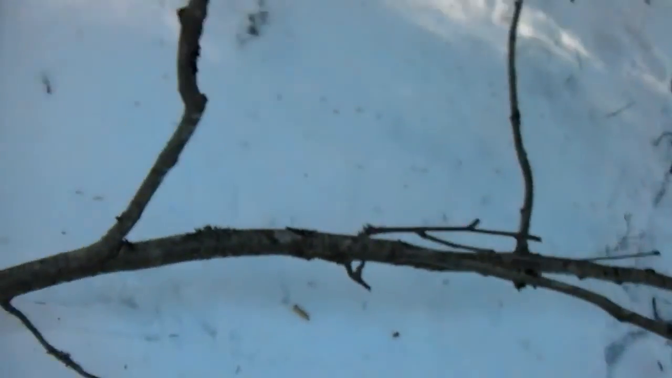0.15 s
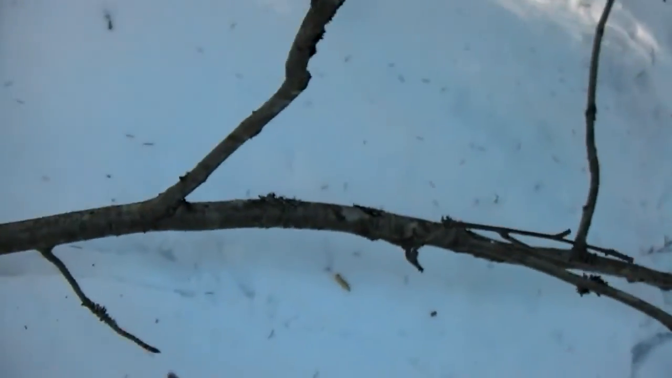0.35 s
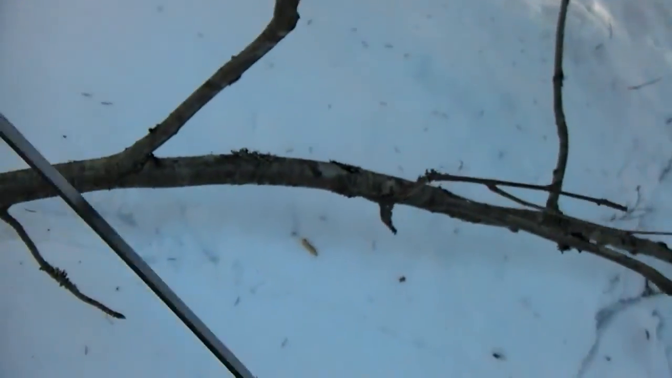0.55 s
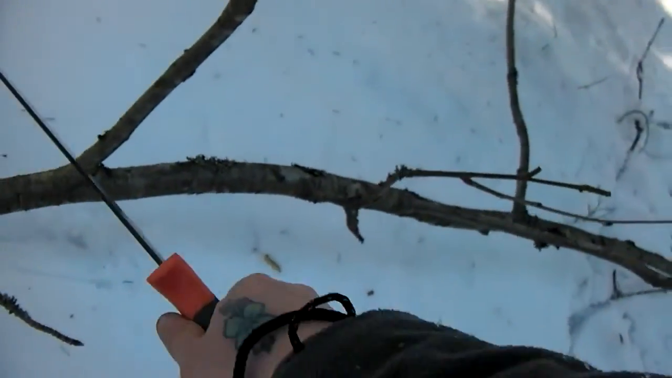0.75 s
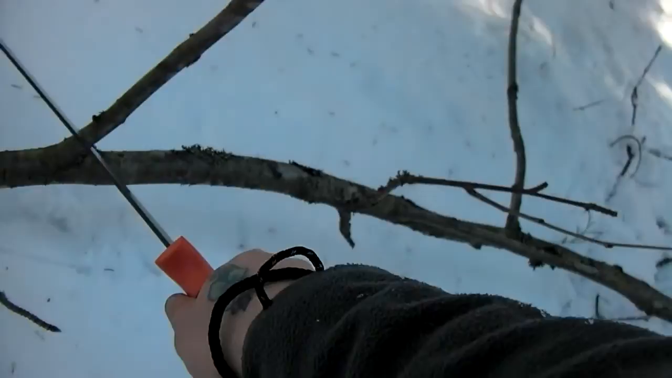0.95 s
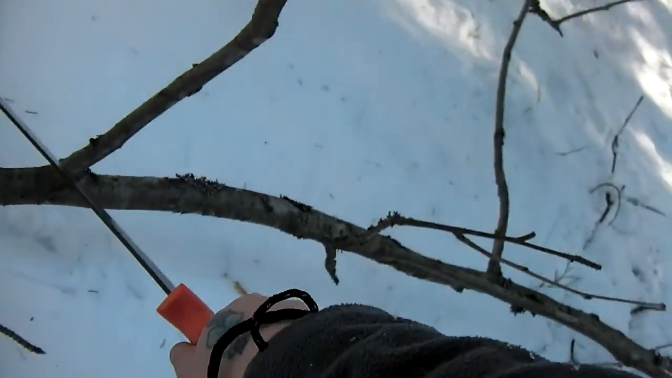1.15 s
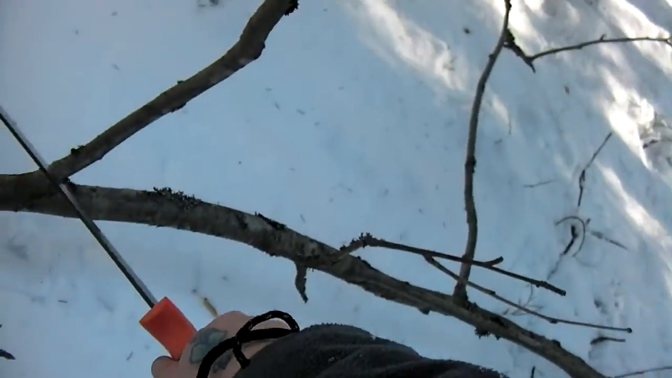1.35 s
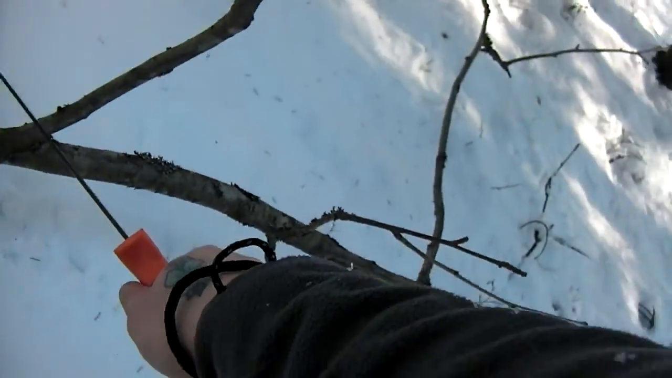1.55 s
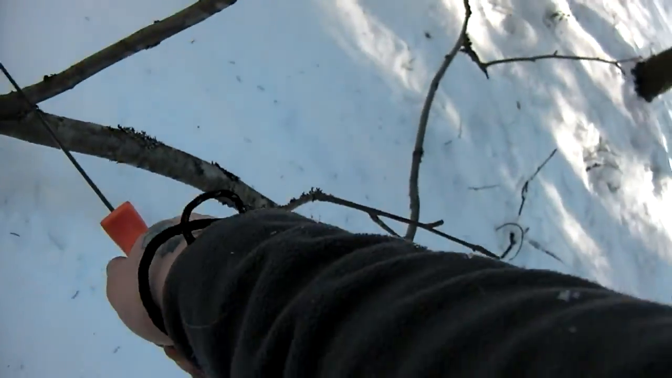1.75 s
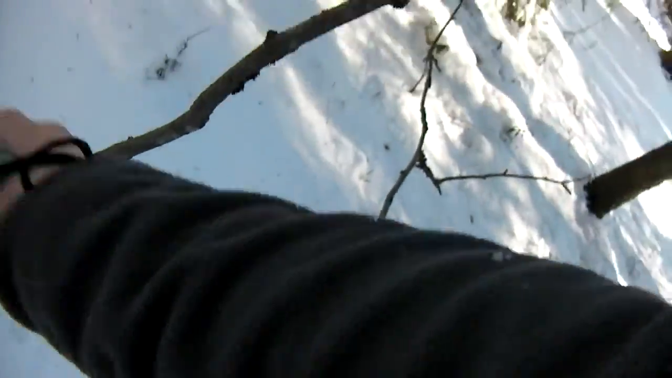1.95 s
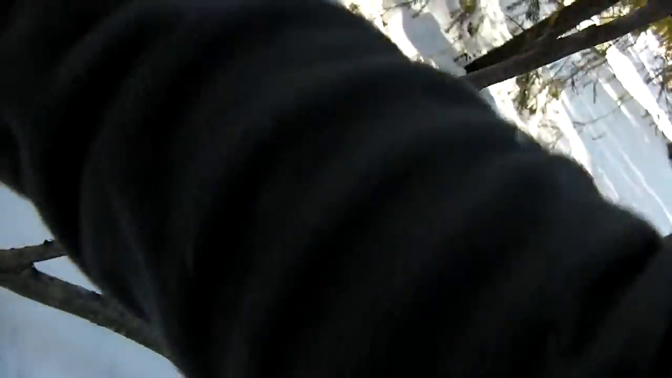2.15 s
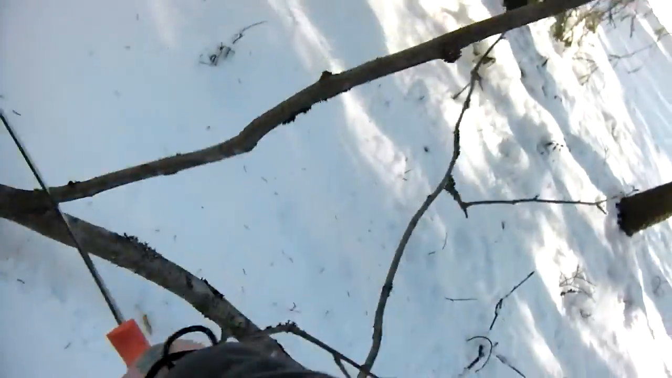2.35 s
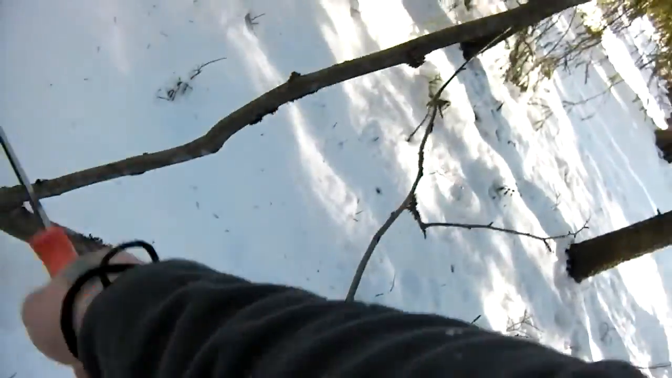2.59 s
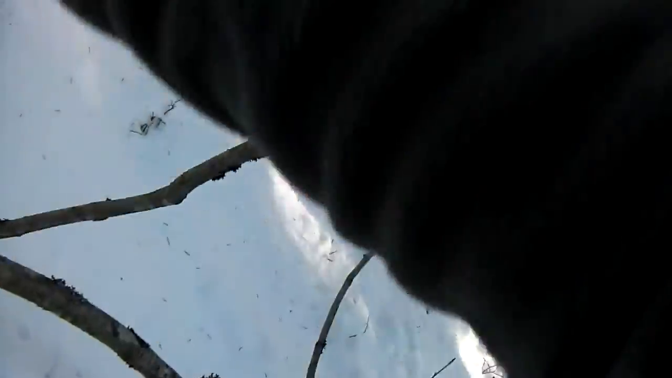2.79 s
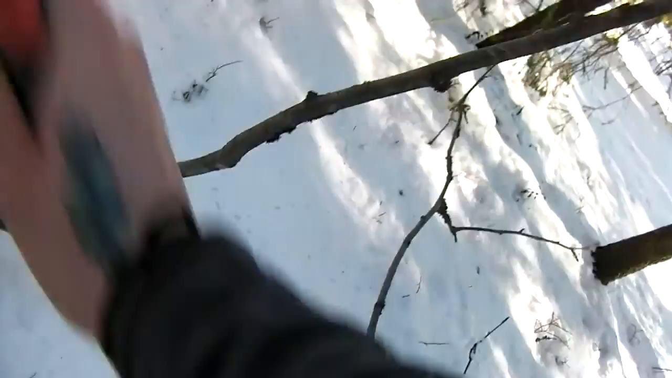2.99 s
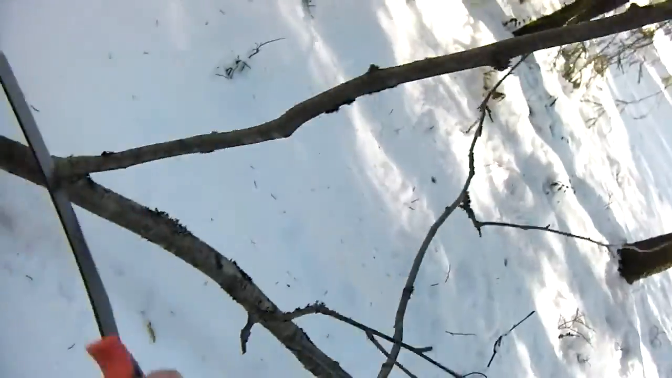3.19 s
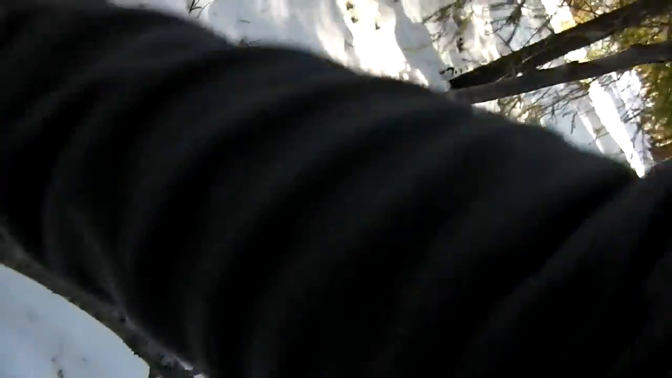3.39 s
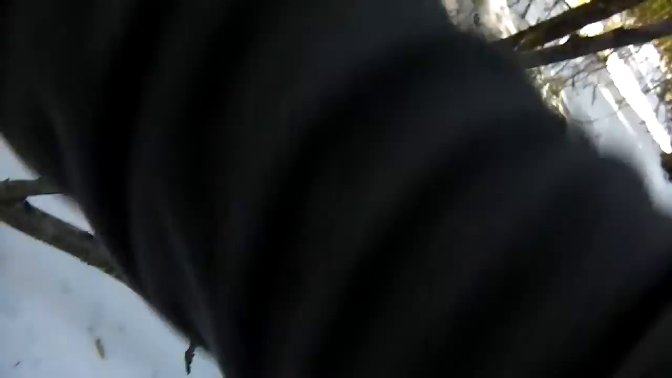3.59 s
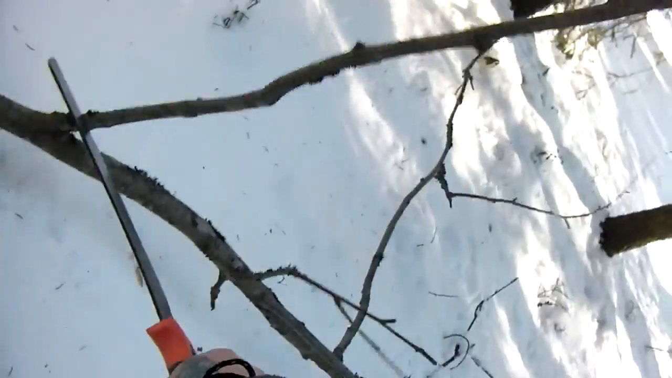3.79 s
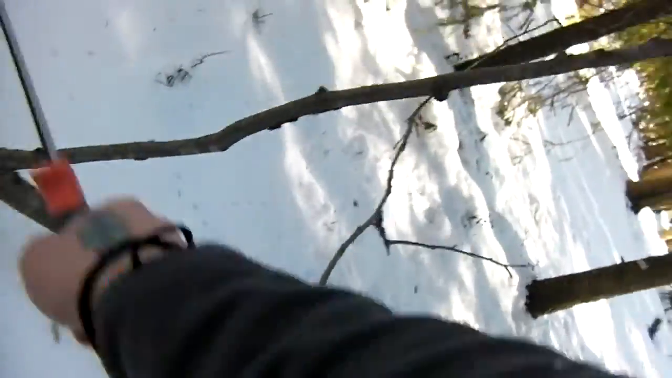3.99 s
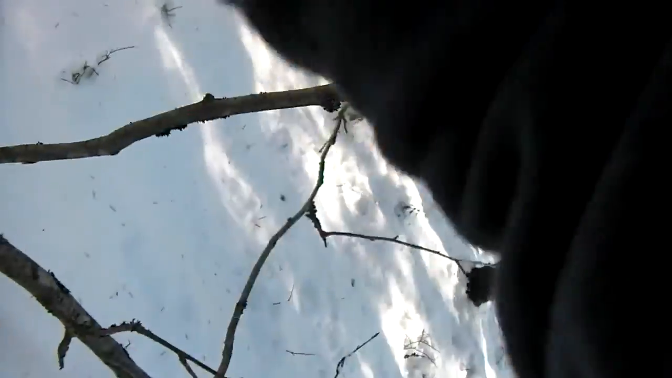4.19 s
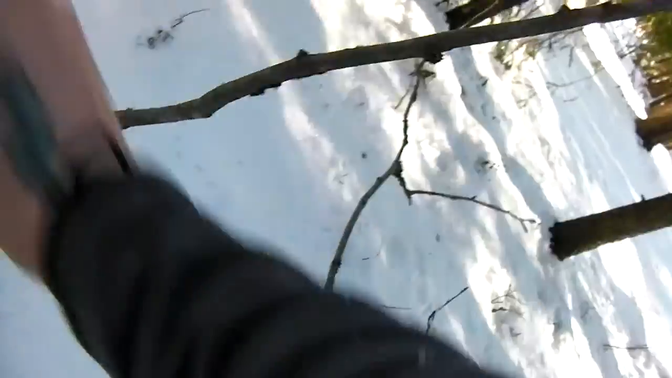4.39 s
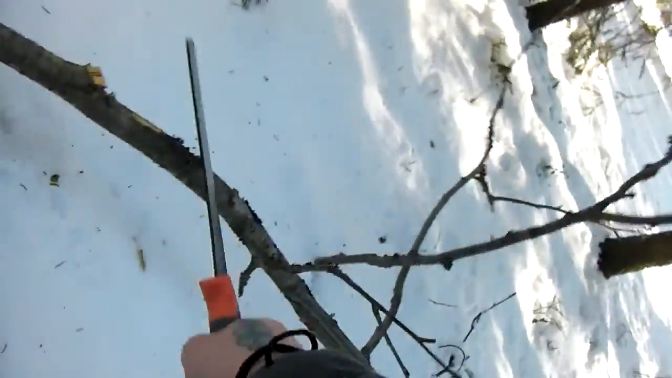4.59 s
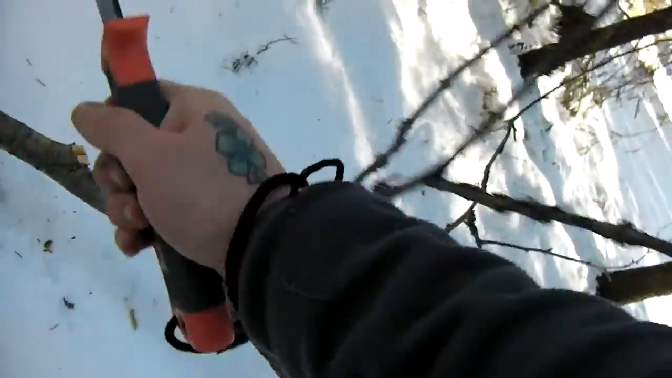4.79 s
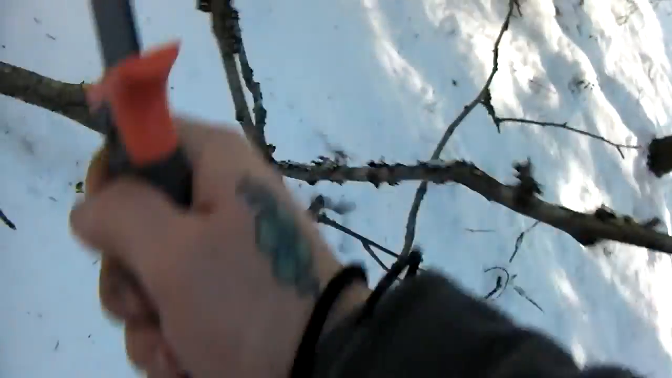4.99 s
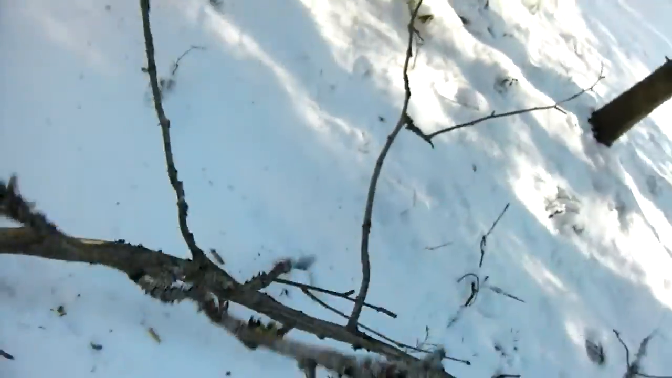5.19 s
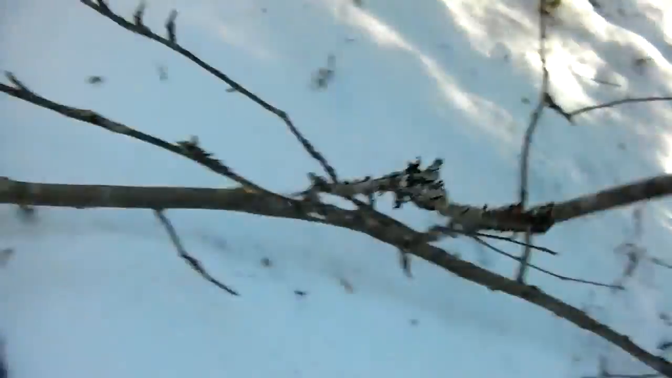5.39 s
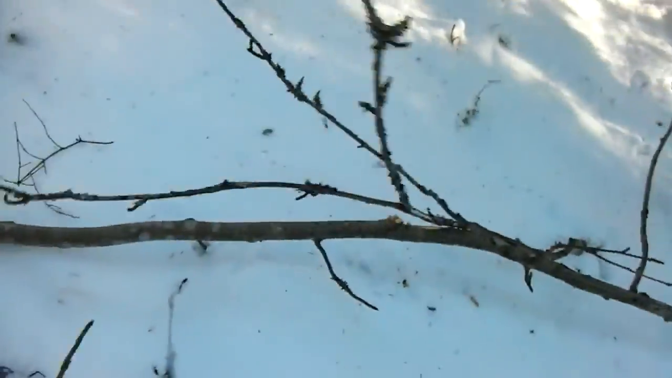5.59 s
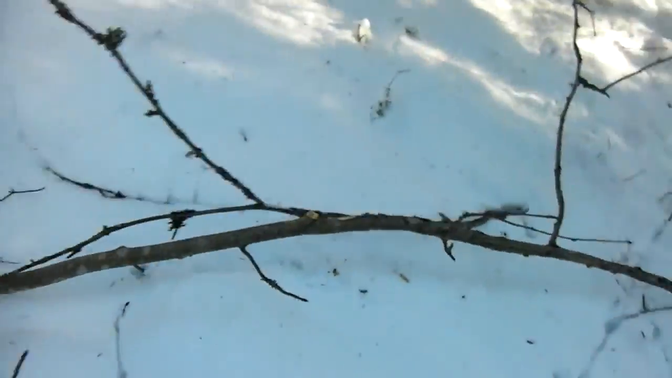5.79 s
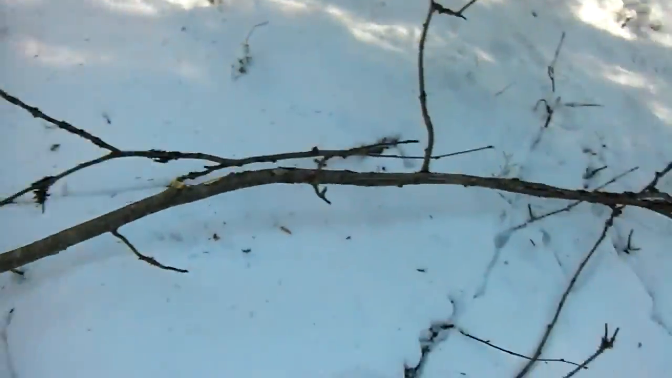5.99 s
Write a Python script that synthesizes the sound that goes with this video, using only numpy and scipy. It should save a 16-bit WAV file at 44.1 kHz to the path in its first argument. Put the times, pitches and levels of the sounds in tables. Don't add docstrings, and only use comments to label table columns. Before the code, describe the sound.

Snow crunches and sleeves rustle, then light knife taps give way to sharp, overloaded chops and snapping twigs, close up outdoors.

```python
import sys
import numpy as np
from scipy import signal
from scipy.fft import rfft, irfft, next_fast_len
from scipy.io import wavfile
from scipy.ndimage import uniform_filter1d

SR = 44100
rng = np.random.default_rng(int(sys.argv[2]) if len(sys.argv) > 2 else 0)


def makeup_ratio(level_db):
    decades = np.asarray(level_db, float) / 20
    return 10 ** decades


def output_pcm(signal):
    pcm = np.clip(np.atleast_2d(signal).T, -1, 1) * 32767
    wavfile.write(sys.argv[1], SR, np.round(pcm).astype(np.int16))


N = 266760

# t/s, crack level/dB, crack top level/dB, knock level/dB, t60/s
BLOWS = [(1.0025, -24, -20.5, -27.5, 0.0096), (1.2536, -25.5, -20, -27, 0.008),
         (1.5118, -24.5, -22.5, -29.5, 0.01), (1.7990, -22.5, -13, -27, 0.0082),
         (2.4373, -2, -2, -11, 0.018), (3.1871, -6, -3, -8, 0.013), (3.8227, -4.5, -2, -12, 0.024),
         (3.8303, -9, -5, -22.5, 0.014), (4.57, -6.5, -13, -14.5, .03), (4.5775, -12, -15, -20.5, 0.03),
         (4.615, -25, -21, -29, 0.031), (4.6272, -16.5, -22, -33, 0.016), (4.631, -19, -21, -35, .022),
         (4.6963, -41, -36, -21.5, 0.016), (5.0328, -12.5, -18, -19, 0.013),
         (5.0595, -34.5, -45, -42, .014), (5.4431, -10, -11, -8.5, 0.013), (5.4512, -15, -16, -15, 0.014)]
# t/s, crack level/dB, crack top level/dB, knock level/dB
TICKS = [(.3906, -26, -27, -26), (.5618, -33, -33, -40), (.7115, -36, -36, -49), (.819, -46, -46, -55),
         (.8598, -43, -41, -52), (.888, -46, -47, -50), (2.0023, -43, -54, -50), (2.368, -45, -54, -42),
         (2.4595, -27, -25, -30), (2.4969, -29, -38, -40), (2.5096, -30, -43, -52), (2.9135, -60, -37, -48),
         (3.2015, -26, -23, -19), (3.2285, -30, -42, -44), (3.2541, -33, -37, -44), (3.8525, -27, -29, -36),
         (4.3078, -34, -35, -43), (4.5995, -28, -27, -38), (4.8469, -37, -46, -42), (4.8761, -38, -55, -60),
         (5.0302, -40, -26, -50), (5.3227, -55, -30, -50), (5.3621, -36, -35, -52), (5.4063, -39, -31, -55),
         (5.6475, -39, -44, -53), (5.8064, -43, -31, -51), (5.8375, -58, -42, -52), (5.9025, -40, -43, -42),
         (5.9538, -41, -42, -48), (6.0095, -43, -52, -48), (.7035, -33, -32, -48), (.1535, -30, -38, -32),
         (.204, -40, -36, -45), (.0672, -41, -48, -55), (.415, -31, -33, -38), (.654, -28, -31, -32),
         (4.608, -35, -29, -45), (3.879, -33, -44, -48), (3.866, -45, -36, -50), (4.1152, -50, -45, -58),
         (4.2364, -50, -41, -58), (2.452, -24, -30, -30), (2.491, -35, -50, -45), (2.523, -45, -38, -52),
         (3.208, -29, -33, -36), (4.669, -50, -55, -38), (1.861, -50, -48, -60), (5.399, -55, -36, -55),
         (5.502, -36, -33, -42), (5.483, -50, -32, -50), (5.33, -60, -37, -60)]
# t/s, level/dB, f/Hz, t60/s
LOW_MODES = [(1.0025, -26.5, 1430, 0.026), (1.2539, -18, 1500, 0.013), (1.5104, -28, 1443, 0.049),
             (1.7986, -18.5, 2430, 0.011), (2.4406, -9, 1360, 0.013), (3.191, 1, 1224, 0.015),
             (3.8228, -14, 2210, 0.02), (4.57, -3, 1650, 0.022), (4.6962, -9.5, 2240, 0.013),
             (5.0332, -10, 1735, 0.026), (5.4445, -3.5, 934, 0.028), (3.188, -16.5, 380, 0.038),
             (2.44, -14.5, 207, 0.025), (3.825, -9, 1480, 0.012), (4.572, -7.5, 2350, 0.016),
             (4.697, -19, 1230, 0.02)]
HIGH_MODES = [(1.0024, -17.5, 6730, 0.011), (1.2537, -12.5, 6300, 0.0069), (1.5114, -14.5, 5930, 0.01),
              (1.7991, -9, 5170, 0.0048), (2.4376, -25, 4330, .012), (3.1876, 0, 5270, 0.0089),
              (3.8226, 5, 5080, 0.0058), (3.831, 4, 6540, 0.0068), (4.571, 2, 5850, 0.014),
              (5.4431, 4, 3420, 0.0063), (5.4514, 3.5, 3750, 0.005)]
# t/s, level/dB,
# f/Hz, t60/s
CONTACT_RINGS = [(1.002, -22, 9010, .03), (1.002, -26, 11310, .045), (1.003, -30, 6340, .03),
                 (1.003, -34, 10110, .03), (1.003, -36, 12650, .03), (1.003, -28, 2950, .012),
                 (1.2535, -29, 6370, .04), (1.2535, -30, 13800, .03), (1.2535, -17, 10700, .007),
                 (1.2535, -20, 13000, .007), (1.254, -38, 7200, .05), (1.2535, -27, 3400, .008),
                 (1.512, -21, 9000, .022), (1.512, -34, 6350, .06), (1.511, -28, 12650, .034),
                 (1.511, -19, 3920, .012), (1.512, -39, 7210, .06), (1.799, -26, 6360, .03),
                 (1.799, -29, 7220, .05), (1.799, -23, 10110, .03), (1.799, -26, 13800, .018),
                 (1.799, -36, 8050, .05), (1.799, -26, 4550, .014), (1.799, -30, 8990, .02),
                 (1.833, -46, 7220, .09), (1.836, -47, 13800, .08), (1.832, -42, 10110, .02),
                 (5.0595, -32, 14830, .012), (5.103, -37, 9000, .03), (5.107, -37, 11310, .05),
               (5.11, -44, 7200, .08), (5.1, -43, 13800, .11), (5.123, -37, 10110, .035),
               (5.112, -46, 12650, .06), (5.103, -40, 6100, .012), (5.096, -38, 3200, .01),
               (5.123, -44, 13800, .07), (5.043, -30, 1300, .03), (3.189, -6, 6300, .01),
               (3.199, -14, 1200, .03), (3.188, -12, 13800, .03), (3.189, -14, 9050, .03),
               (3.188, -8, 10700, .008), (2.438, -4, 10500, .008), (2.438, -5, 14000, .008),
               (3.831, -4, 9100, .008), (3.8235, -4, 11700, .007), (3.837, -15, 4200, .007),
               (3.222, -27, 3100, .008), (3.229, -22, 3700, .007)]
# t/s, level/dB, share of the free t60/1
BLADE_RINGS = [
    (5.0327, -18, .46),
    (5.0595, -37, .45),
    (5.102, -46, .8),
]
# f/Hz, level/dB, t60/s
BLADE_MODES = [(7200, -11, .12), (8055, -2.5, 0.19), (9050, -0.5, 0.1), (10110, 5, 0.08), (11310, 2, 0.09),
               (12650, -7, .08), (13800, -9, 0.23), (14830, -20, 0.066), (6045, -18, .1), (11920, -16, .1),
               (13240, -20, .12)]
# blow t/s, lead/s, level/dB, low level/dB, level change near 8 kHz/dB
LEAD_INS = [
    (1.0026, 0.012, -45, -53, 2),
    (1.253, 0.014, -52, -60, 0),
    (1.5113, 0.015, -50, -56, 0),
    (1.798, 0.023, -48, -55, 2),
    (2.437, 0.027, -28, -30, 2),
    (3.1878, 0.028, -33.5, -34, -1),
    (3.823, .025, -29, -31, -40),
    (4.5704, 0.027, -25, -35, -4),
    (5.033, 0.02, -40, -48, 4),
    (5.4426, 0.025, -34, -25, 1),
]
# blow t/s, lead/s, level/dB, f/Hz, width/Hz
WHISTLES = [
    (3.823, 0.025, -28, 6520, 130),
    (3.823, 0.026, -34, 9750, 180),
    (5.443, 0.021, -29, 3600, 1500),
    (3.187, 0.022, -40, 2970, 350),
    (4.57, 0.023, -25, 5800, 2500),
    (.152, .045, -40, 2600, 1200),
]
# t/s, level/dB, f/Hz, t60/s
WHIPS_LEFT = [
    (5.434, -5, 1110, 0.015),
    (5.4447, 8, 1110, 0.016),
    (5.4532, 1, 1150, 0.016),
    (5.421, -24, 1150, .012),
]
WHIPS_RIGHT = [
    (5.446, 5, 481, 0.026),
    (5.4535, -0.5, 595, 0.013),
]
WHIP_LEAK = [-0.55, 0.26]
# t/s, level/dB
CLINKS = [(0.82, -43), (.921, -47), (1.048, -46), (1.075, -45), (.768, -51), (.79, -50), (.885, -49),
          (.345, -46), (.95, -53)]
# t/s, crack level/dB, top level/dB, body level/dB, length/s
CRUNCHES = [(0.029, -42, -46, -39, .012), (0.044, -37, -38, -32, 0.0094), (0.147, -44, -50, -28, 0.018),
            (0.163, -36.5, -39, -27, 0.02), (0.192, -41.5, -52, -41, 0.025), (0.281, -55, -45, -38, 0.007),
            (0.312, -46, -42, -31, 0.011), (0.388, -39, -34, -27.5, 0.019), (.408, -41, -48, -29.5, 0.022),
            (0.4832, -27.5, -30, -24.5, 0.015), (0.576, -30, -34, -25, 0.017),
            (0.639, -25.5, -27.5, -25, .024), (.690, -27.5, -29.5, -33, 0.016),
            (2.748, -84, -45, -50, 0.0059), (2.766, -75, -42, -52, 0.037), (4.187, -62, -43.5, -74, 0.032),
            (4.746, -34.5, -68, -46, 0.024), (5.503, -42, -33, -42, 0.04), (5.738, -41.5, -38, -39, 0.026),
            (5.882, -47.5, -37, -44, 0.022)]
# middle t/s, crack level/dB, top level/dB, body level/dB, length/s
SCRAPES = [(0.11, -66, -47, -43, 0.11), (0.167, -45, -41, -37, .12), (0.44, -43, -41, -39.5, .13),
           (0.536, -65, -50, -44, 0.085), (0.623, -66, -54, -53, 0.07), (0.67, -60, -45, -39.5, .12),
           (4.749, -40, -43, -64, 0.054), (5.38, -61, -42, -50, 0.045), (5.477, -60, -38, -59, .04),
           (5.528, -47, -41.5, -34.5, .065), (5.925, -50, -46, -49, .11), (5.12, -47.5, -42.5, -57, 0.077),
           (5.688, -63, -49.5, -65, 0.055), (4.862, -53, -58, -47, .05), (0.48, -50, -60, -46, .05)]
# t/s, sleeve rustle level/dB, extra brightness of stretched cloth/dB, left-right lean/dB
ARM = [(0, -59, -1.5, 4), (.13, -39.5, -2, 1.5), (.27, -56.5, 1, 2), (.45, -45, -5, 1), (.75, -56.5, -2, 2),
       (1.06, -72, -3, 1.5), (2.19, -70, -3, 0), (2.45, -52.5, -0.5, -1.2), (2.76, -56, 5, -2.5),
       (2.9, -62.5, 3, -1), (3.25, -51.5, -1, -1), (3.7, -56.5, 2.2, 1.5), (3.99, -53, -0.5, -2.5),
       (4.4, -59, 4.5, 3.5), (4.72, -49.5, 0, -2.3), (4.97, -64.5, 9.5, -0.5), (5.36, -53.5, -5, -1),
       (6.05, -53, -1.5, 0.5)]
# t/s, level/dB, f/Hz, t60/s
STEP_JOLTS = [(.047, -18.5, 180, .027), (.165, -30, 166, 0.096), (.197, -30.5, 132, .075),
              (.282, -36, 135, 0.097), (.316, -24, 121, 0.042), (.381, -18.5, 137, 0.016),
              (.391, -18.5, 115, 0.041), (.419, -30, 91, .093), (.485, -33, 99, .098),
              (.579, -41, 186, .08), (.645, -27.5, 168, 0.056), (.695, -39, 88.8, 0.073),
              (.785, -43, 102, 0.12), (3.870, -28.5, 80, 0.086), (5.447, -14.5, 288, 0.029)]
BLOW_JOLTS = [(1.0005, -38.5, 147, 0.048), (1.252, -32.5, 148, 0.022), (1.513, -32, 144, 0.033),
              (1.8, -33, 155, 0.018), (2.438, -28.5, 135, 0.15), (3.188, -11.5, 181, 0.025),
              (3.818, -24.5, 95, 0.085), (4.569, -18.5, 79.4, 0.038), (4.693, -28, 138, 0.026),
              (5.031, -29, 112, 0.029), (5.4395, -6.5, 103, 0.045)]
SIDE_JOLTS = [
    (1.153, -30, 124, 0.034),
    (4.444, -39.5, 103.5, 0.12),
]
# f/Hz, side-mid level/dB
NEAR_SIDE = [(60, -13), (250, -15), (700, -14), (1400, -11.5), (2500, -7), (5000, -3.5), (15000, -4)]
# middle t/s, level/dB, half length/s
GUSTS = [(.35, -56, 0.056), (0.628, -45.5, 0.096), (0.847, -52, 0.068), (1.24, -51, 0.19),
         (2.495, -41.5, 0.072), (3.222, -35.5, 0.048), (3.55, -45.5, 0.043), (3.754, -43.5, 0.14),
         (4.21, -50.5, 0.038), (4.562, -45, 0.099), (5.447, -34, 0.033), (5.918, -53, 0.089),
         (5.99, -38.5, 0.059)]
# f/Hz, level per Hz/dB
WASH = [(18, -47), (30, -17), (75, -7), (263, -18.5), (389, -0.5), (519, -1), (607, -6), (853, -5.5),
        (1020, -5.5), (2020, -18.5), (2560, -25.5), (6070, -24.5), (7880, -30), (9220, -26), (15600, -29)]
# f/Hz, side-mid level/dB
WASH_SIDE = [(60, -5), (110, -5.5), (200, -6), (380, -10.5), (700, -11.5), (1290, -9.5), (2380, 4),
             (4400, 3.5), (8120, 3.5), (15000, -1)]


def evened(x):
    return x / np.sqrt(np.mean(x ** 2) + 1e-20)


def read(points, hz):
    f, value = np.transpose(points)
    return np.interp(np.log(hz + 1), np.log(f + 1), value)


def add(mix, s, sound):
    part = mix[:, round(s * SR):][:, :sound.shape[1]]
    part += sound[:, :part.shape[1]]


def band(x, lo_hz, hi_hz, order=2):
    sos = signal.butter(order, [lo_hz, hi_hz], "band", fs=SR, output="sos")
    return evened(signal.sosfilt(sos, x))


def coloured(x, points):
    size = next_fast_len(N)
    gain = makeup_ratio(read(points, np.fft.rfftfreq(size, 1 / SR)))
    return irfft(rfft(x, size) * gain, size)[..., :N]


def lumps(hz):
    f = np.fft.rfftfreq(N, 1 / SR)
    return evened(irfft(rfft(rng.standard_normal(N)) / (1 + (f / hz) ** 2), N))


def grit(size, spread_db):
    grains = makeup_ratio(spread_db * np.minimum(rng.exponential(1, size // 24 + 1), 5))
    return rng.standard_normal((2, size)) * np.repeat(grains, 24)[:size]


def splinter(noise, crack_db, top_db, body_db, body_hz, body_width):
    crack = makeup_ratio(crack_db) * band(noise, 1980, 8280) + makeup_ratio(top_db) * band(noise, 6530, 14100)
    body = makeup_ratio(body_db) * band(noise, body_hz / body_width, body_hz * body_width, order=1)
    return crack, body


def blow(s, crack_db, top_db, knock_db, knock_hz=700, t60=0.012):
    t = np.arange(round(.5 * SR)) / SR
    crack, knock = splinter(grit(len(t), 1.74), crack_db, top_db, knock_db, knock_hz, 1.9)
    burst = (1 - np.exp(-t / 0.00011)) * makeup_ratio(-60 * (t / t60) ** 1.077)
    chips = makeup_ratio(-21.0 - 60 * t / (5 * t60)) + makeup_ratio(-31.0 - 60 * t / (22 * t60))
    chips *= makeup_ratio(0.085 * (max(crack_db, top_db) + 11.0))
    clumps = np.repeat(rng.standard_normal(len(t)), 150)[:len(t)]
    chips *= makeup_ratio(2.2 * uniform_filter1d(clumps, size=80))
    swell = (1 - np.exp(-t / 0.00021)) * makeup_ratio(-60 * t / (3.22 * t60))
    side_db = 0.3 * (max(crack_db, -25) + 12.5)
    return s, makeup_ratio([[0], [side_db]]) * (crack * (burst + chips) + knock * (swell + 0.35 * chips))


def chop(s, crack_db, top_db, knock_db, t60):
    return blow(s, crack_db, top_db, knock_db, 400 - 27 * knock_db, t60)


def mode(s, db, hz, t60):
    t = np.arange(round(.1 * SR)) / SR
    tone = np.sin(2 * np.pi * (hz * t + rng.random((2, 1)))) * (1 - np.exp(-t / .0004))
    tone[1] *= makeup_ratio(.2 * (np.clip(db, -25, -5) + 10))
    return s, tone * makeup_ratio(db - 60 * t / np.clip(t60, .005, .11))


def blade_ring(s, db, share):
    t = np.arange(round(.3 * SR)) / SR
    phases = 2 * np.pi * rng.random((len(BLADE_MODES), 2, 1))
    sound = np.zeros((2, len(t)))
    for (hz, mode_db, t60), phase in zip(BLADE_MODES, phases):
        decay = makeup_ratio(db + mode_db - 60 * t / (share * t60))
        sound += decay * np.sin(2 * np.pi * hz * t + phase)
    return s, sound


def lead_in(s, lead, db, low_db, gap_db):
    t = np.arange(round((lead + .001) * SR)) / SR
    hz = np.fft.rfftfreq(2000, 1 / SR)
    hiss, low = splinter(rng.standard_normal((2, 2000)), db, db + 0.5, low_db, 950, 3.5)
    gap = makeup_ratio(gap_db * (abs(hz - 8100) < 1350))
    gapped = irfft(rfft(hiss + low) * gap)[:, :len(t)]
    return s - lead, gapped * (1 - np.exp(-t / .005)) ** 2


def whistle(s, lead, db, hz, width):
    t = np.arange(round(lead * SR)) / SR
    hiss = band(rng.standard_normal((2, 3000)), hz - width / 2, hz + width / 2)[:, -len(t):]
    return s - lead, makeup_ratio(db) * hiss * (1 - np.exp(-t / .004)) ** 2


def add_whips(near):
    for port, whips in enumerate((WHIPS_LEFT, WHIPS_RIGHT)):
        shares = np.roll([[1], [WHIP_LEAK[port]]], port)
        for row in whips:
            s, tone = mode(*row)
            add(near, s, shares * tone[0])


def clink(s, db):
    return mode(s, db, 10430, .03)


def crunch(s, crack_db, top_db, body_db, length):
    u = np.arange(round(.15 * SR)) / SR / np.clip(length, .004, .06) * 2.22
    crack, body = splinter(grit(len(u), 2.0), crack_db, top_db, body_db, 700, 2.4)
    return s - .0025, (crack + body) * (u * np.exp(1 - u)) ** 3


def scrape(s, crack_db, top_db, body_db, length):
    size = round(np.clip(length, .02, .2) * 1.5 * SR)
    noise = grit(round(.3 * SR), 1.9)[:, :size]
    crack, body = splinter(noise, crack_db, top_db, body_db, 1500, 1.8)
    return s - size / SR / 2, (crack + body) * np.hanning(size)


def rustle(level_db, stretch_db):
    noise = grit(N, 2.15) * makeup_ratio(2.05 * lumps(32))
    crack, body = splinter(noise, level_db, level_db + stretch_db, level_db - 11.0, 1730, 2.0)
    return crack + body


def jolt(s, db, hz, t60, side_db, way):
    t = np.arange(round(.25 * SR)) / SR
    turns = hz * t * (1 + 0.43 * np.exp(-t / 0.0026))
    cycles = np.sin(2 * np.pi * turns) + 0.055 * np.sin(2 * np.pi * 35 * t)
    decay = makeup_ratio(db + 6.0 - 60 * t / np.clip(t60, .02, .4))
    push = way * cycles * (1 - np.exp(-t / 0.0018)) * decay
    return s, np.array([push, makeup_ratio(side_db) * push])


def body_jolts():
    jolts = np.zeros((2, N))
    # rows, side level/dB, direction
    for rows, side_db, way in ((STEP_JOLTS, -27, 1), (BLOW_JOLTS, -21, -1), (SIDE_JOLTS, 10.5, 1)):
        for row in rows:
            add(jolts, *jolt(*row, side_db, way))
    return jolts


def wind():
    t = np.arange(N) / SR
    level = makeup_ratio(-63.5)
    for s, db, half in GUSTS:
        level = level + makeup_ratio(db) * np.exp(-((t - s) / half) ** 2)
    flutter = makeup_ratio(2.9 * np.array([lumps(8.3), lumps(8.3)]))
    return band(rng.standard_normal((2, N)), 67, 135, order=1) * level * flutter


def wash():
    mid, side = coloured(rng.standard_normal((2, N)), WASH)
    level = makeup_ratio(-46 + .6 * lumps(4))
    return level * np.array([mid, coloured(side, WASH_SIDE)]) / np.std(mid)


def scene():
    near = np.zeros((2, N))
    modes = LOW_MODES + HIGH_MODES + CONTACT_RINGS
    sources = ((chop, BLOWS), (blow, TICKS), (mode, modes), (blade_ring, BLADE_RINGS), (lead_in, LEAD_INS),
               (whistle, WHISTLES), (clink, CLINKS), (crunch, CRUNCHES), (scrape, SCRAPES))
    for source, rows in sources:
        for row in rows:
            add(near, *source(*row))
    s, *columns = np.transpose(ARM)
    rustle_db, stretch_db, lean_db = (np.interp(np.arange(N) / SR, s, c) for c in columns)
    near += rustle(rustle_db, stretch_db)
    near[1] = coloured(near[1], NEAR_SIDE)
    near = np.array([near[0] + near[1], near[0] - near[1]])
    near *= makeup_ratio([lean_db / 2, -lean_db / 2])
    add_whips(near)
    mid, side = wash() + body_jolts()
    return near + wind() + np.array([mid + side, mid - side])


def low_pass(x):
    return signal.sosfilt(signal.butter(12, 15700, fs=SR, output="sos"), x)


def record(dry):
    dipped = signal.lfilter(*signal.iirnotch(7830, 30, SR), dry)
    mix = np.clip(0.19 * dry + 0.9 * dipped, -.97, .97)
    return low_pass(mix)


dry = scene()
out = record(dry)
output_pcm(out)
```